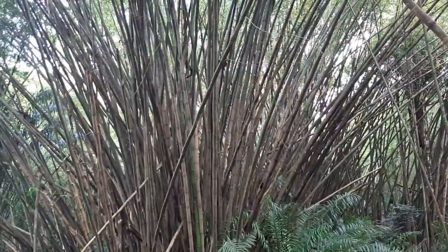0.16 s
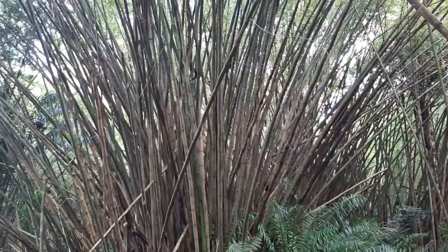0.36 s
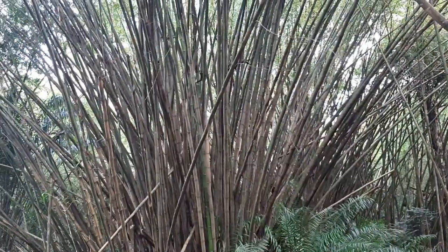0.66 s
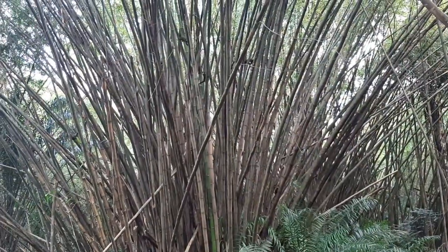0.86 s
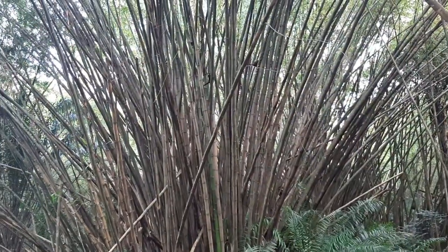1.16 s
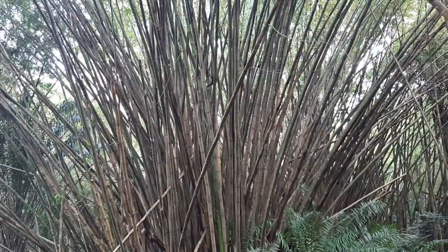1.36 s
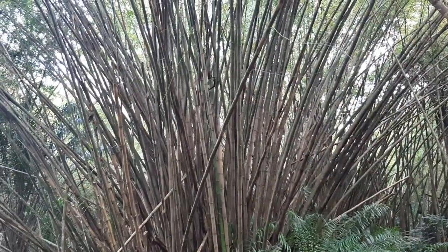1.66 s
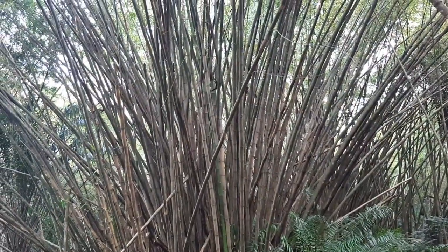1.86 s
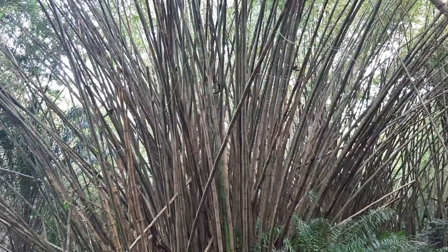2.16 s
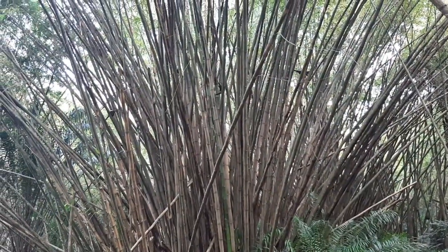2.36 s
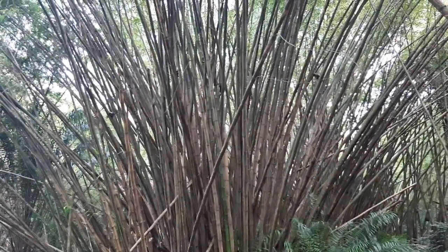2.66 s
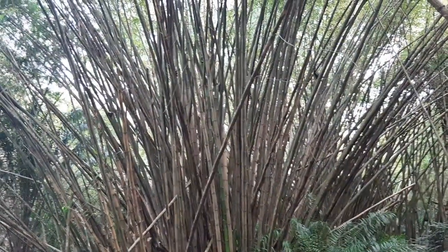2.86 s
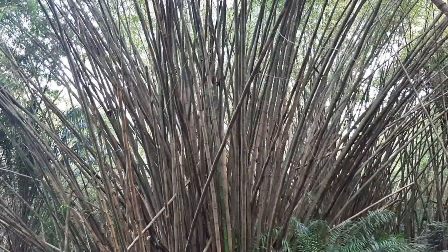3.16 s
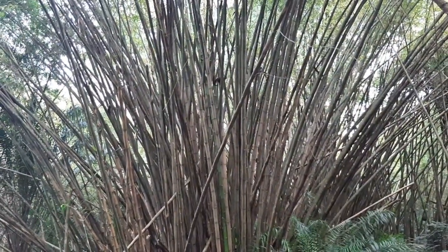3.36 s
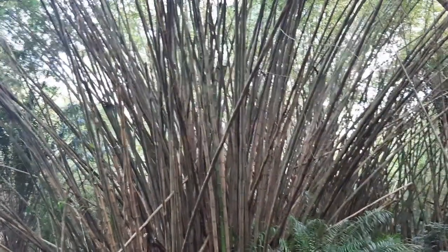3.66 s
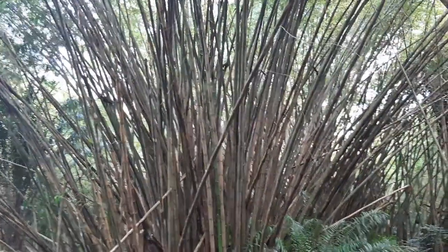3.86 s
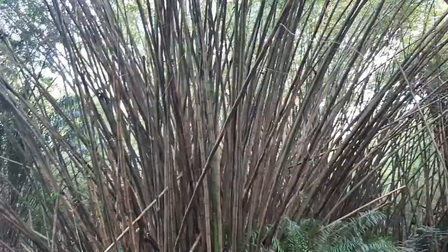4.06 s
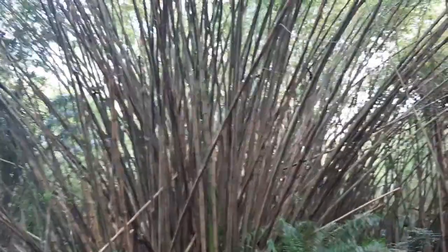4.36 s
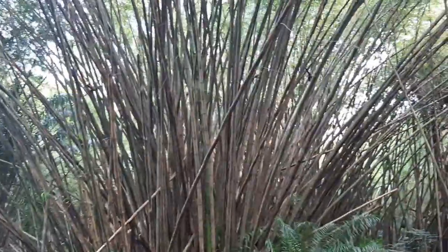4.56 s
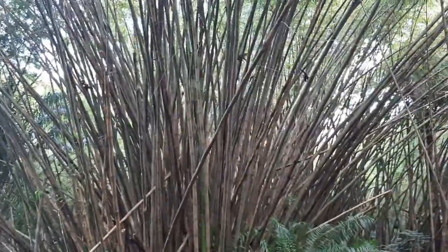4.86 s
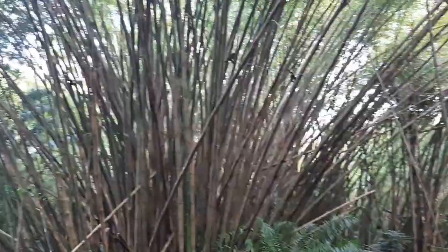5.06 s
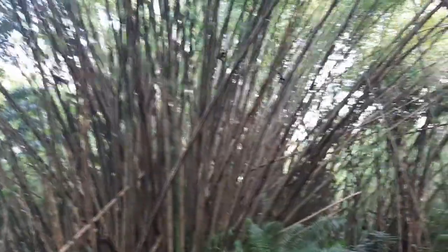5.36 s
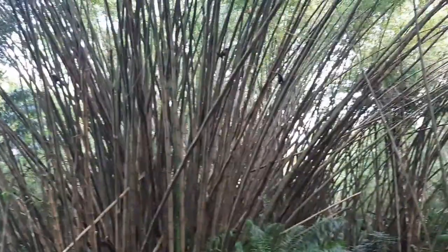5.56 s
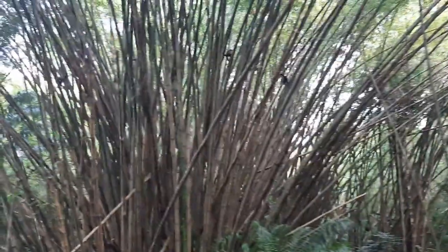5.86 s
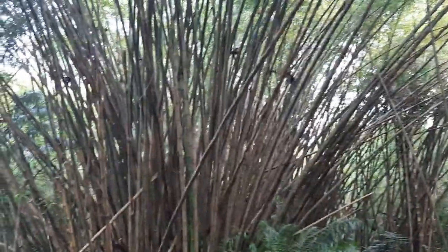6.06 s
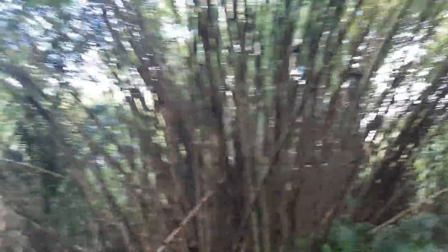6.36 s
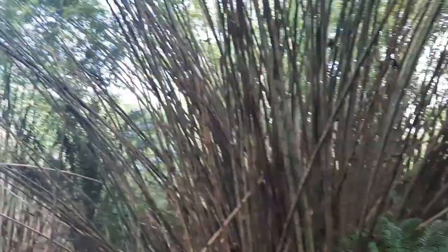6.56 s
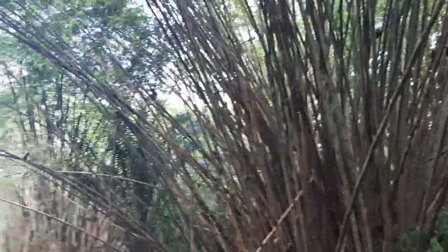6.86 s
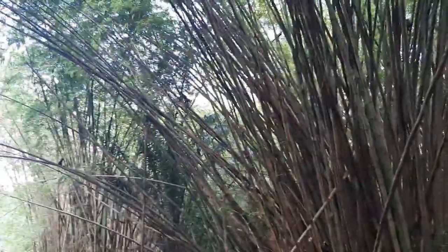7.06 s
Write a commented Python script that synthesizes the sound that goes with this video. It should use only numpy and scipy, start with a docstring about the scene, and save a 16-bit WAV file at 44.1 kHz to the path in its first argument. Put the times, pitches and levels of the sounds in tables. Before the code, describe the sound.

Soft leaf hiss fills a bamboo thicket, with sparse distant peeps and a barely audible low motor hum. During the first second small monkeys give faint whines, short coos and chirps; a hollow stem knocks near 0.6 and 0.75, and a twig snaps at 0.86. A bright chirp at 1.07 leads into gliding high squeals from 1.2. Strong chirps ring at 2.3 and 2.45, a stem knocks clearly at 2.7, and a twig cracks just before 3. The loudest squeal rises and falls around 3.0-3.7, ending in a harsh screech. Squeals continue from 3.9, with another rasp at 4.45 and warbles at 4.85, 5.5 and 6.4. Low gusts buffet mainly the right side from about 4.3. Knocks and a snap come near 6.1, a screech at 6.6, then thin whines and knocks until 7.2. Calls scatter diffusely among the stems.

```python
"""Monkeys in a bamboo thicket

Small monkeys give gliding squeals, whines, warbles and harsh screeches, built from swept harmonics, amid
short chirps, coos and random far peeps. Noise bursts make hollow knocks and snapping twigs.
A dying noise tail scatters the calls and knocks among the stems. Banded noise makes the leaves hiss,
lumpy low noise buffets the microphone ports, mostly the right, and a wavering sine is a far motor."""
import sys
import numpy as np
from scipy import signal
from scipy.io import wavfile
from scipy.ndimage import uniform_filter1d

SR = 44100
rng = np.random.default_rng(int(sys.argv[2]) if len(sys.argv) > 2 else 0)


def output_pcm(signal):
    """Save a mono or channel-first signal as 16-bit PCM at the path in sys.argv[1].

    Samples are clipped to [-1, 1] before scaling.
    """
    pcm = np.clip(np.atleast_2d(signal).T, -1, 1) * 32767
    wavfile.write(sys.argv[1], SR, np.round(pcm).astype(np.int16))


def elevation(decibels):
    """Turn decibel levels (scalar or array-like) into linear amplitude ratios."""
    levels = np.asarray(decibels, float)
    return 10 ** (levels / 20)


N = 317961   # samples, about 7.2 s

# Long squeals: second harmonic over the first [dB], step between higher overtones [dB],
# course of points (t/s, f/Hz, level/dB)
SQUEAL_COURSES = [(-22, -17, [(1.17, 3800, -50), (1.4, 4127, -42), (1.65, 4260, -37), (1.75, 4563, -35),
                  (2.0, 4350, -40.5)]), (-8.5, -24, [(1.62, 4430, -52), (1.72, 4610, -46),
                  (1.78, 5116, -31.5), (1.98, 4987, -36), (2.09, 4434, -34), (2.14, 3480, -37.5)]),
                  (-13.5, -30, [(2.16, 4566, -39.5), (2.33, 4520, -40), (2.58, 4600, -39),
                  (2.63, 4410, -35), (2.71, 4233, -33.5), (2.76, 3760, -31), (2.8, 2990, -43.5)]),
                  (-8, -14.5, [(2.94, 3226, -49), (3.0, 3800, -45.5), (3.06, 4790, -39),
                  (3.14, 5280, -32.5), (3.2, 5368, -29.5), (3.28, 5282, -24), (3.4, 4706, -25.5),
                  (3.55, 4436, -33), (3.59, 4255, -23.5), (3.63, 3767, -35), (3.69, 3850, -38)]),
                  (-19, -10, [(3.35, 3530, -36), (3.41, 3795, -42), (3.49, 3500, -43.5),
                  (3.53, 3020, -54)]), (-10.5, -17, [(3.93, 4350, -52), (3.97, 4880, -31.5),
                  (4.1, 4410, -37), (4.35, 4210, -32.5), (4.42, 3450, -29.5), (4.52, 3220, -41),
                  (4.6, 3390, -40.5), (4.65, 2630, -40.5), (4.7, 2210, -38)]),
                  (-10, -16.5, [(4.84, 4404, -50), (4.97, 4273, -37.5), (5.1, 4060, -39),
                  (5.16, 3718, -41.5), (5.22, 2923, -52)]), (-7, -22, [(5.2, 4427, -45), (5.5, 4386, -51.5),
                  (5.56, 4030, -36.5), (5.72, 3536, -38.5), (5.9, 3374, -37.5), (5.97, 2355, -46)]),
                  (2.5, 0, [(5.76, 3103, -60), (5.86, 3213, -58), (6.02, 3280, -45.5), (6.1, 3007, -53.5),
                  (6.17, 3017, -48), (6.24, 3204, -50), (6.31, 3280, -47), (6.36, 2690, -49)]),
                  (1.5, -0.5, [(6.5, 2880, -52), (6.57, 3190, -49.5), (6.65, 3310, -48), (6.7, 2970, -49)]),
                  (-0.5, -3, [(7.14, 3004, -50), (7.21, 3360, -49)])]
# Fainter whines on one bend of pitch: start t/s, length t/s, first f/Hz, middle f/Hz, last f/Hz,
# middle level/dB, second harmonic level/dB over the first
WHINE_BENDS = [(0.0, 0.083, 3520, 3510, 3540, -62, -20), (0.04, 0.17, 4610, 4080, 4070, -49, -26),
               (0.55, 0.13, 3410, 3390, 3420, -55.5, -26), (0.71, 0.118, 3800, 3830, 3890, -55, -22),
               (0.731, 0.04, 2590, 2850, 3280, -46, -22), (0.862, 0.15, 3660, 3830, 3770, -52.5, -15),
               (1.1, 0.28, 3070, 3200, 3210, -56, -20), (2.28, 0.2, 4743, 4394, 3987, -36.5, -11),
               (2.36, 0.39, 3340, 3615, 3590, -46.5, -5.5), (2.977, 0.066, 3550, 3430, 2990, -39.5, -19),
               (3.1, 0.3, 3435, 3160, 3150, -47.5, -1), (3.344, 0.03, 3240, 2820, 2300, -38.5, -20),
               (4.16, 0.15, 2495, 2657, 3440, -45, -4), (4.3, 0.13, 3470, 3630, 3750, -42, -14),
               (4.72, 0.34, 3106, 3040, 3006, -46, -0.5), (5.318, 0.3, 3020, 2983, 2875, -43.5, -1.5),
               (5.338, 0.12, 2191, 2240, 2260, -43, -2), (5.371, 0.06, 1090, 1575, 1925, -45, 1.5),
               (5.95, 0.2, 2810, 2935, 2957, -43, -4), (6.14, 0.26, 3510, 4120, 3526, -43.5, -5),
               (6.31, 0.064, 1380, 1780, 2110, -48, 6), (6.902, 0.26, 1740, 1980, 2046, -53.5, -1.5)]
# Harsh screeches: start t/s, length t/s, centre f/Hz, level/dB, pitch scatter [share],
# second harmonic level/dB over the first, place of the crest [share of the length]
SCREECH_CALLS = [(3.685, 0.087, 4170, -28.5, 0.16, -11.5, 0), (4.44, 0.18, 3688, -32, 0.124, -7.5, 0.54),
                 (6.595, 0.24, 3142, -30, 0.125, -11, 0.83)]
# Warbles: start t/s, opening crest t/s, opening crest f/Hz, deep dip t/s, swinging stops t/s, end t/s, level/dB
WARBLE_CALLS = [(4.835, 4.885, 2400, 4.925, 5.05, 5.14, -28), (5.49, 5.53, 2500, 5.6, 5.77, 5.9, -25.5),
                (6.365, 6.395, 2270, 6.455, 6.625, 6.82, -29)]
# The phrase the warbles share, swings ever smaller and quicker: t/s after the dip, f/Hz, level/dB over the call
WARBLE_SWINGS = [(0, 2020, -6), (.073, 2638, -1), (.125, 2260, 0.5), (.17, 2540, -1)]
# Short high chirps: t/s, level/dB, f/Hz, second harmonic level/dB over the first
CHIRP_CALLS = [(0.3366, -51, 2930, -16), (0.6009, -34.5, 2520, -27), (0.9931, -48, 2150, -15),
               (1.0731, -28.5, 2400, -2), (1.1049, -34, 2403, -1), (1.1696, -36.5, 3180, -21),
               (1.555, -41, 2570, -8), (1.6813, -31.5, 2960, -24), (1.8157, -41, 3170, -16),
               (2.061, -37, 3300, -20), (2.181, -36.5, 2320, 4), (2.2805, -18.5, 2514, -11),
               (2.4452, -23.5, 2304, -6), (2.6904, -35, 2590, -32), (3.0779, -23.5, 3010, -11),
               (3.65, -38, 2318, -12), (4.721, -36, 2507, -7)]
# Short low coos: t/s, level/dB, f/Hz
COO_CALLS = [(0.336, -50, 1221), (0.602, -46, 1524), (0.718, -50, 1245), (0.775, -41.5, 1497),
             (0.917, -49, 1540), (1.723, -44.5, 892), (1.816, -42, 1550), (2.059, -38, 1445),
             (2.324, -50.5, 866), (2.875, -50, 1460), (3.052, -40.5, 1320), (3.257, -42, 1675),
             (3.7, -46, 1390), (3.784, -35.5, 1490), (3.972, -42.5, 1164), (4.28, -44.5, 1061),
             (4.459, -40.5, 1287), (4.92, -46, 1218), (5.283, -48.5, 1610), (5.832, -49, 1265),
             (6.45, -47, 1603), (7.131, -55, 1340)]
# Hollow stems knocking as climbers land: t/s, level/dB of the noise before its band filter
STEM_KNOCKS = [(0.598, -37), (0.745, -39.5), (1.555, -41), (2.7, -28.5), (6.04, -35.5), (6.85, -32.5),
               (7.129, -37.5)]
# Twigs snapping: t/s, level/dB
TWIG_SNAPS = [(0.8595, -35.5), (2.972, -32.5), (6.1994, -33)]
# Colour of the leaf hiss: f/Hz, relative level/dB per Hz
LEAF_SPECTRUM = [(24, -40), (40, -8.5), (133, -17), (209, -16), (529, -11), (918, -9.5), (1520, -6.5),
                 (3470, -2), (8550, -13.5), (12100, -11.5), (16000, -65)]
# Left-right likeness of the hiss: f/Hz, correlation [-1 to 1, negative values play as 0]
LEAF_LIKENESS = [(60, 0.69), (240, 1), (950, 0.12), (3770, -0.15), (15000, 0.22)]
# Stir in the low leaves: t/s, relative level/dB
LEAF_STIR = [(0, -3.5), (1.3, 0.5), (3.3, 2.5), (5.2, -0.5), (7.21, 0)]
# Gusts on the ports: crest t/s, crest level/dB ahead of each port's own gain
WIND_GUSTS = [(4.33, -53), (4.55, -57), (4.95, -63), (5.27, -48.5), (5.5, -52.5), (6.1, -74), (6.481, -48),
              (6.85, -54.5), (7.1, -63)]
# Far motor: t/s, rms level/dB
MOTOR_LEVEL = [(0, -80), (.74, -68), (1.4, -77.5), (4.5, -74), (5, -86), (7.21, -80.5)]


def rms_one(x):
    """Scale to rms 1."""
    return x / np.sqrt(np.mean(x ** 2) + 1e-20)


def in_time(rows):
    """A (t/s, value) table read at every sample."""
    return np.interp(np.arange(N) / SR, *np.transpose(rows))


def at_hz(points, hz):
    """A (f/Hz, value) table read on a log frequency axis."""
    table_hz, values = np.transpose(points)
    return np.interp(np.log(hz), np.log(table_hz), values)


def drift(rate_hz, size):
    """Slow random wander: noise twice through a one-pole low-pass, scaled to rms 1."""
    r = np.exp(-2 * np.pi * rate_hz / SR)
    warm_up = 8000   # samples thrown away while the filter settles
    noise = rng.standard_normal(size + warm_up)
    return rms_one(signal.lfilter([1], [1, -2 * r, r * r], noise)[warm_up:])


def add(out, start_s, sound, pan_db):
    """Lay a sound in, louder and a little earlier on its own side; positive pan is left."""
    for side, sign in enumerate((1, -1)):
        at = max(round((start_s - sign * pan_db * 8e-6) * SR), 0)
        out[side, at:at + len(sound)] += elevation(sign * pan_db / 2) * sound[:N - at]


def voice(hz, second_db, step_db):
    """A fundamental with up to three overtones, its loudness fluttering with breath pressure."""
    phase = 2 * np.pi * np.cumsum(hz) / SR
    out = np.sin(phase)
    for k in (2, 3, 4):
        in_range = k * hz < .36 * SR   # overtones too high are left out
        out += elevation(second_db + step_db * (k - 2)) * np.sin(k * phase) * in_range
    return out * elevation(2.2 * drift(40, size=len(hz)))


def long_call(t, hz, level_db, second_db, step_db, hoarse):
    """Tight vocal folds follow a pitch course with a trace of wobble, each call from a perch of its own."""
    out = np.zeros((2, N))
    fade = np.clip(np.minimum(t - t[0], t[-1] - t) / 0.0047, 0, 1)
    wobbly_hz = hz * (1 + hoarse * drift(150, size=len(t)))
    sound = voice(wobbly_hz, second_db, step_db) * elevation(level_db) * fade
    add(out, t[0], sound, pan_db=rng.normal(-2, 2))
    return out


def squeals():
    """Vocal folds glide smoothly from pitch to pitch, corners rounded over about 25 ms."""
    out = 0
    for second_db, step_db, course in SQUEAL_COURSES:
        s, pitch, level_db = np.transpose(course)
        t = np.arange(s[0], s[-1], 1 / SR)
        glide_hz = uniform_filter1d(np.interp(t, s, pitch), size=1100, mode="nearest")
        out = out + long_call(t, glide_hz, np.interp(t, s, level_db), second_db, step_db, hoarse=.004)
    return out


def whines():
    """A parabola of pitch through three points under an arch of breath."""
    out = 0
    ends_db = -3.5   # the ends are softer than the middle
    for s, length_s, first_hz, middle_hz, last_hz, level_db, second_db in WHINE_BENDS:
        u = np.linspace(-1, 1, round(length_s * SR))
        slope = (last_hz - first_hz) / 2
        bend = (first_hz + last_hz) / 2 - middle_hz
        hz = middle_hz + slope * u + bend * u ** 2
        t = s + (u + 1) / 2 * length_s
        out = out + long_call(t, hz, level_db + ends_db * u ** 2, second_db, step_db=-21, hoarse=.014)
    return out


def screeches():
    """Overblown folds lose their rhythm: the pitch scatters fast and the call turns to a rasp."""
    out = np.zeros((2, N))
    for s, length_s, hz, level_db, scatter, second_db, crest in SCREECH_CALLS:
        t = np.arange(0, length_s, 1 / SR)
        edge = np.clip(np.minimum(t / 0.003, (length_s - t) / 0.017), 0, 1)
        shape = edge * elevation(-8 * abs(t / length_s - crest))
        scattered_hz = hz * (1 + scatter * drift(500, size=len(t)))
        rasp = voice(scattered_hz, second_db, step_db=-16)
        add(out, s, elevation(level_db) * shape * rasp, pan_db=-2.5)
    return out


def warbles():
    """The pitch swings roundly from turn to turn, then holds while the breath runs out."""
    scoop_hz = 221   # slide up to the opening crest
    opens_db, closes_db = -8.5, -12.5   # first breath; loss over the held end
    flutter_db = 3   # shaky breath, rms
    out = 0
    after, pitch, phrase_db = np.transpose(WARBLE_SWINGS)
    for s, crest_s, crest_hz, dip_s, stop_s, end_s, level_db in WARBLE_CALLS:
        t = np.arange(s, end_s, 1 / SR)
        held = np.minimum(t, stop_s)   # time stands still once the swinging stops
        turns = np.r_[s, crest_s, dip_s + after]
        count = np.arange(len(turns))
        place = np.interp(held, turns, count)
        rounded = np.floor(place) + (1 - np.cos(np.pi * (place % 1))) / 2   # cosine path between turns
        hz = np.interp(rounded, count, np.r_[crest_hz - scoop_hz, crest_hz, pitch])
        breath_db = np.interp(held, turns, np.r_[opens_db, opens_db, phrase_db])
        breath_db = breath_db + closes_db * (t - held) / (end_s - stop_s)
        shaky_db = level_db + breath_db + flutter_db * drift(28, size=len(t))
        out = out + long_call(t, hz, shaky_db, second_db=-12.5, step_db=-9.5, hoarse=.009)
    return out


def peep(hz, length_s, second_db, droop, wobble):
    """One puff of breath: quick swell, slower fall, the pitch sliding and unsteady."""
    u = np.arange(0, max(length_s, .01), 1 / SR)
    share = u / u[-1]
    sliding_hz = hz * (1 + droop * (.5 - share) + wobble * drift(97, size=len(u)))
    phase = 2 * np.pi * np.cumsum(sliding_hz) / SR
    swell = np.minimum(u / 0.0074, 1) * np.cos(np.pi / 2 * share)
    return swell * (np.sin(phase) + elevation(second_db) * np.sin(2 * phase))


def chirps():
    """Short high puffs, nearly level in pitch, each starting 6 ms ahead of its listed time."""
    out = np.zeros((2, N))
    for s, level_db, hz, second_db in CHIRP_CALLS:
        sound = peep(hz, 0.036, second_db, droop=0.041, wobble=.02)
        add(out, s - .006, elevation(level_db) * sound, pan_db=-7.5)
    return out


def coos():
    """Longer, lower puffs that sag in pitch, each starting 6 ms ahead of its listed time."""
    out = np.zeros((2, N))
    for s, level_db, hz in COO_CALLS:
        sound = peep(hz, .055, second_db=-8, droop=.1, wobble=.045)
        add(out, s - .006, elevation(level_db) * sound, pan_db=-2)
    return out


def knocks():
    """A hollow stem gives a short dying rattle of noise in the middle range."""
    t60_s = 0.12
    t = np.arange(round(.15 * SR)) / SR
    out = np.zeros((2, N))
    band = signal.butter(2, [900, 4200], "band", fs=SR, output="sos")
    for (s, level_db), noise in zip(STEM_KNOCKS, rng.standard_normal((len(STEM_KNOCKS), len(t)))):
        dying = noise * elevation(level_db - 60 * t / t60_s)
        add(out, s, signal.sosfilt(band, dying), pan_db=-3.0)
    return out


def twigs():
    """Each snap is a few milliseconds of dying noise, differenced to brighten it."""
    out = np.zeros((2, N))
    t = np.arange(300) / SR
    for (s, level_db), noise in zip(TWIG_SNAPS, rng.standard_normal((len(TWIG_SNAPS), len(t)))):
        snap = np.diff(noise, prepend=0) * np.exp(-t / 0.0011)
        add(out, s, elevation(level_db) * snap, pan_db=-1.5)
    return out


def far_chatter():
    """The rest of the troop peeps at random, deep in the thicket, sliding up or down."""
    peeps_per_s, loudest_db = 11, -52
    out = np.zeros((2, N))
    for when, pitch, softness, slide in rng.random((round(peeps_per_s * N / SR), 4)):
        hz = 800 * 4.5 ** pitch ** 1.5   # 800 to 3600 Hz, low ones favoured
        sound = peep(hz, 0.052, second_db=-5.5, droop=0.335 * (slide - .5), wobble=0.042)
        add(out, when * N / SR, elevation(loudest_db - 10 * softness) * sound, pan_db=-2.0)
    return out


def thicket(voices):
    """Stems return a dense dying scatter, another to each port; thin ones favour treble, which dies sooner."""
    t60_s, treble_db, dull_hz = 1, 3.5, 6800
    t = np.arange(round(1.2 * SR)) / SR
    scatter = rng.standard_normal((2, len(t))) * np.minimum(t / 0.0032, 1)
    dull = signal.sosfilt(signal.butter(1, dull_hz, fs=SR, output="sos"), scatter)
    bright = (scatter - dull) * elevation(treble_db - 60 * t / (0.86 * t60_s))
    echo = dull * elevation(-60 * t / t60_s) + bright
    echo = echo / np.sqrt(t60_s * SR / np.log(1e6))   # about unit energy ahead of the treble lift
    mono = voices.mean(axis=0)[None]
    return signal.fftconvolve(mono, echo, axes=1)[:, :N] * elevation([[-1.5], [1.5]])


def leaves(patchy_db):
    """Half-octave bands of hiss, each with its own flicker and left-right likeness."""
    out = 0
    edges = 40 * 2 ** np.arange(0, 9, .5)
    white = rng.standard_normal((2, 2, N))
    for k, (low, high) in enumerate(zip(edges, edges[1:])):
        band = signal.butter(2, [low, high], "band", fs=SR, output="sos")
        mid, side = signal.sosfilt(band, white[k % 2])   # neighbouring bands use separate noise
        hz = np.sqrt(low * high)
        alike = np.clip(at_hz(LEAF_LIKENESS, hz), 0, .99)
        flicker = np.repeat(drift(300, size=N // 40 + 1), 40)[:N]   # drawn once per 40 samples
        stir_db = in_time(LEAF_STIR) * np.clip(np.log2(4000 / hz), 0, 1)   # full below 2 kHz, none from 4 kHz
        gain = elevation(at_hz(LEAF_SPECTRUM, hz) + patchy_db * flicker + stir_db)
        out = out + gain * (np.sqrt(1 + alike) * mid + np.sqrt(1 - alike) * side * [[1], [-1]])
    top_band = signal.butter(4, [14480, 15600], "band", fs=SR, output="sos")
    top = signal.sosfilt(top_band, white[1])
    hiss = rms_one(out + elevation(at_hz(LEAF_SPECTRUM, 16500)) * top)
    return hiss * elevation(-47.5) * elevation([[-1.5], [1.5]])


def wind():
    """Lumpy low noise, its own at each port, far stronger on the right; gusts rise fast and die away."""
    rise_db_per_s, fall_db_per_s, calm_db = 134, 103, -83
    s, crest_db = np.transpose(WIND_GUSTS)[:, :, None]
    late = np.arange(N) / SR - s
    slopes_db = np.minimum(rise_db_per_s * late, -fall_db_per_s * late)
    gust_db = np.max(crest_db + slopes_db, axis=0)   # the strongest gust rules
    band = signal.butter(3, [48, 115], "band", fs=SR, output="sos")
    rumble = signal.sosfilt(band, rng.standard_normal((2, N)))
    lumps = elevation(3 * np.array([drift(8, size=N), drift(8, size=N)]))
    return rms_one(rumble * lumps) * elevation(np.maximum(gust_db, calm_db)) * elevation([[-12], [5]])


def motor():
    """A low sine that wavers slightly in pitch while its level comes and goes."""
    hz = 138 + 0.86 * drift(1.8, size=N)
    phase = 2 * np.pi * np.cumsum(hz) / SR
    return np.sqrt(2) * elevation(in_time(MOTOR_LEVEL)) * np.sin(phase)


def scene():
    """The troop, dry and scattered, over the forest floor sounds."""
    long = squeals() + whines() + screeches()
    short = chirps() + coos() + warbles() + knocks()
    far = far_chatter()
    # the chirping and warbling callers sit nearer, so less of them comes back from the stems
    scattered = elevation(3) * thicket(long + elevation(-4) * short + far)
    return long + short + far + scattered + twigs() + leaves(patchy_db=.8) + wind() + motor()


def top_cut(x):
    """Nothing passes above the cut-off."""
    return signal.sosfilt(signal.butter(12, 16530, fs=SR, output="sos"), x)


def record(dry):
    """The right port faces more openly and hears more treble than the left."""
    tilt_db = 3.5   # right over left, well above the corner
    treble = signal.sosfilt(signal.butter(1, 3800, "high", fs=SR, output="sos"), dry)
    port_gain = elevation(tilt_db / 2 * np.array([[-1], [1]]))
    mix = dry + treble * (port_gain - 1)
    return top_cut(mix)


dry = scene()
out = record(dry)
output_pcm(out)
```